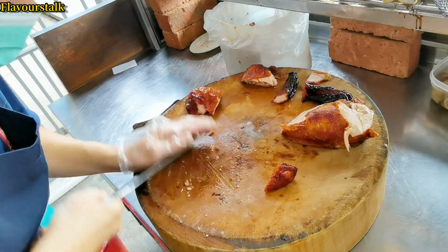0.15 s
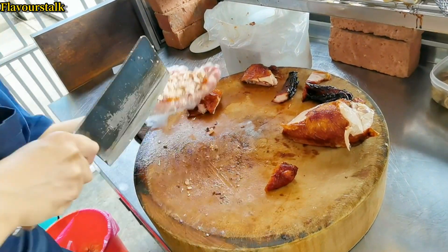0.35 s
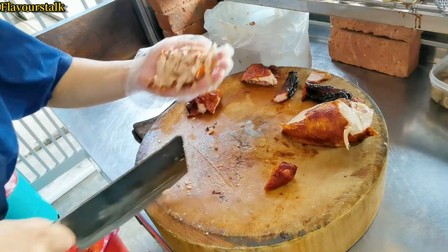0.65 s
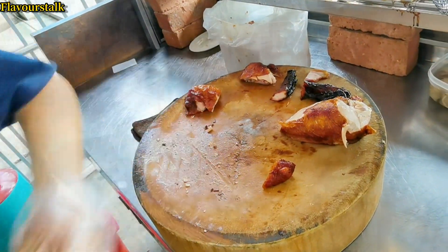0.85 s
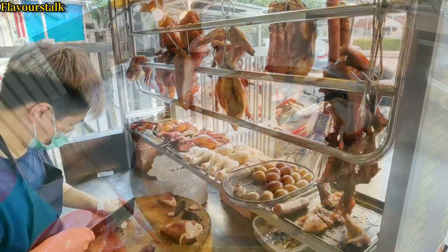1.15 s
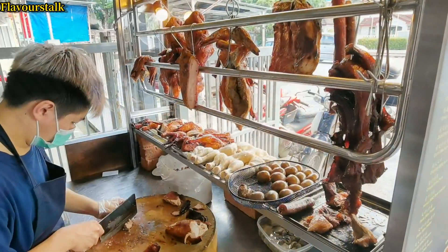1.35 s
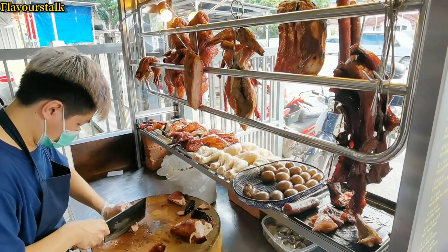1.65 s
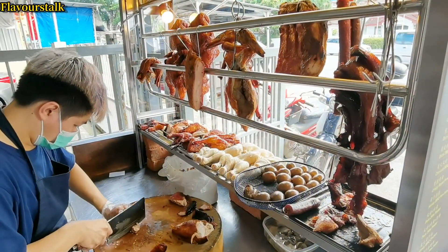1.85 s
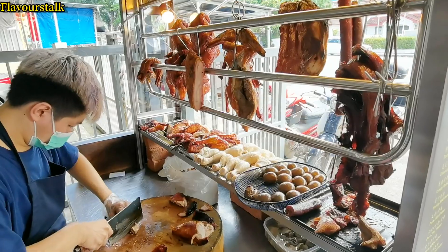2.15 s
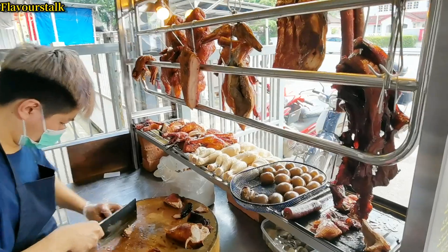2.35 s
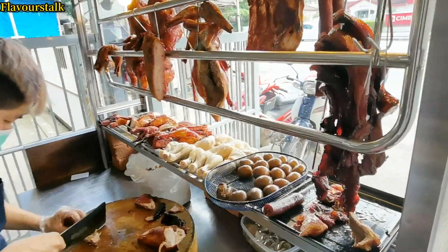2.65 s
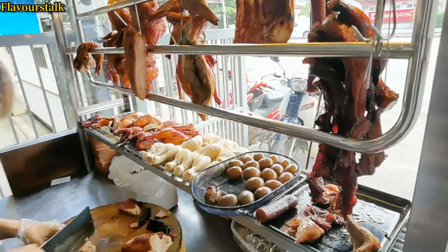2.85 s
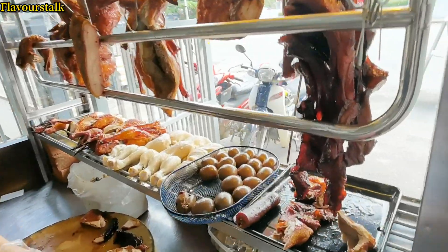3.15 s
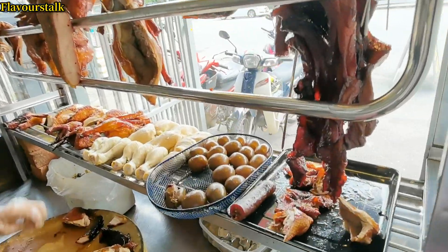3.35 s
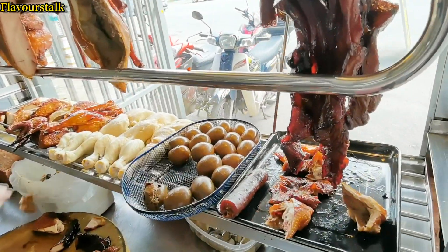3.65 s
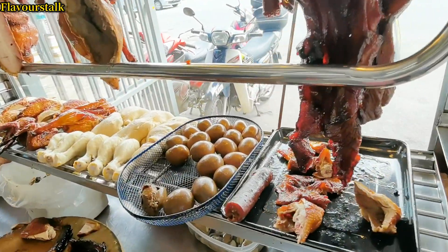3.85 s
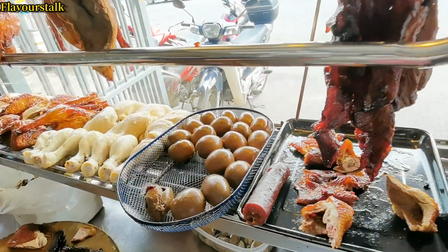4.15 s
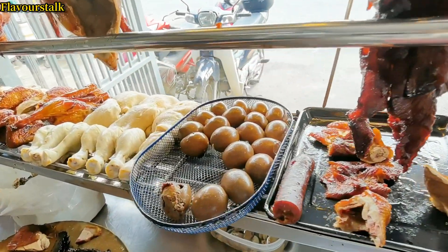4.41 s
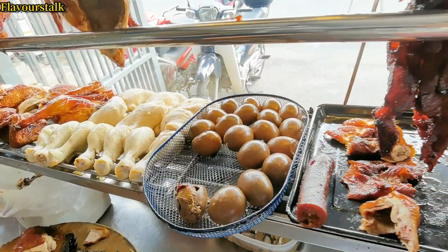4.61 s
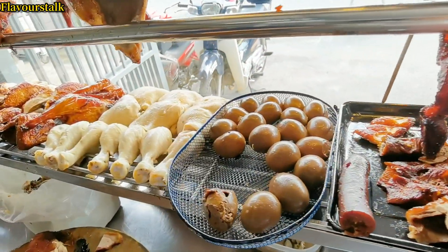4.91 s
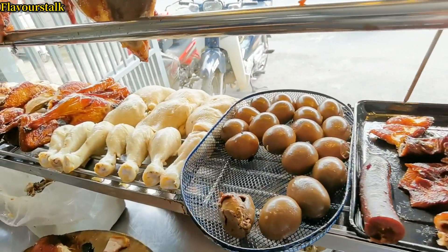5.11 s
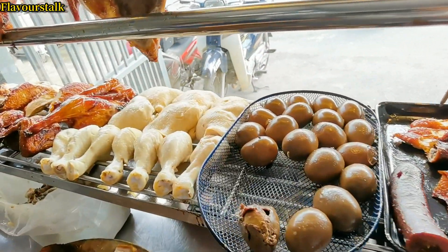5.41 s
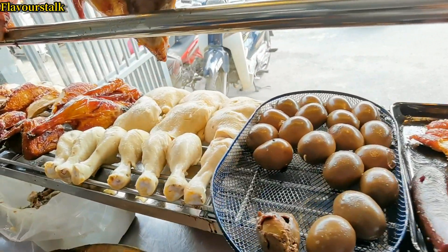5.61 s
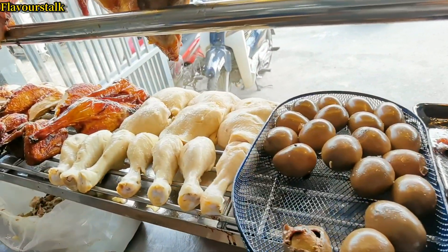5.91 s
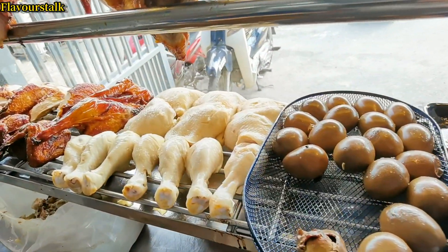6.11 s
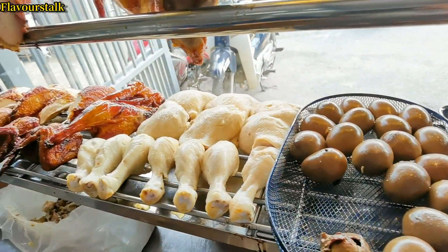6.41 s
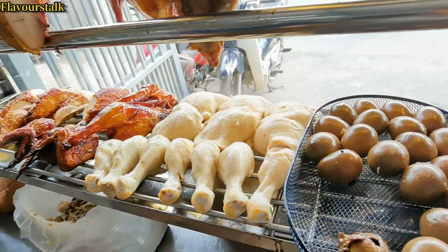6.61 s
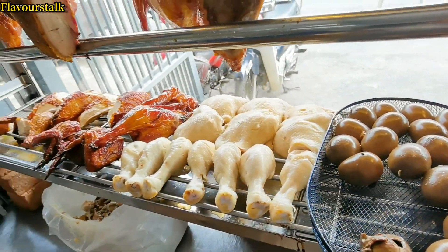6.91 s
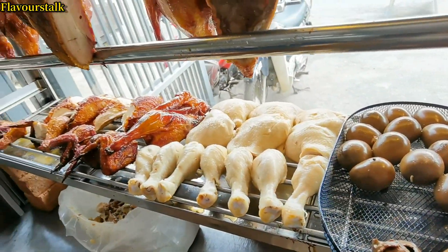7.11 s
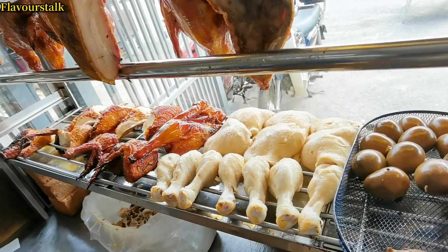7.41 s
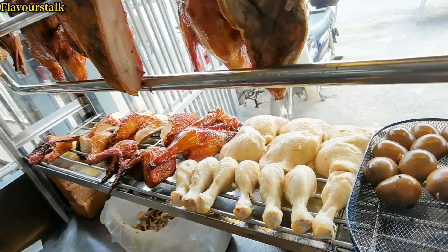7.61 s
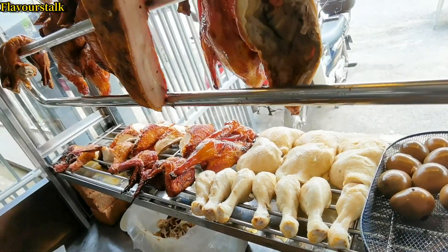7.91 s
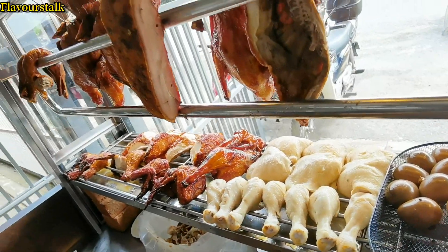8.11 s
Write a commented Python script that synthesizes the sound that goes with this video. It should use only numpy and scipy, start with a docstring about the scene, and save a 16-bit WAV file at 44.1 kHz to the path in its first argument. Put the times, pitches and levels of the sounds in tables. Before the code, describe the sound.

A heavy cleaver chops cooked meat and bone on a thick wooden block, with scrapes, plastic rustles and faint traffic rumble behind.

```python
"""A cleaver chops roast chicken on a thick wooden block that stands on a steel counter in a street stall.
Each stroke tears skin, snaps bone and excites damped modes of blade, block and counter; the stall answers
with near reflections and a diffuse tail. Between strokes the blade scrapes and squeaks, steel pings, and thin
plastic rustles and snaps, all shaped from noise or sine tones. Traffic and a faint hiss are coloured noise
behind; a limiter holds the peaks."""
import sys
import numpy as np
from scipy import signal
from scipy.fft import rfft, irfft, next_fast_len
from scipy.io import wavfile
from scipy.ndimage import uniform_filter1d, minimum_filter1d, map_coordinates

SR = 44100
rng = np.random.default_rng(int(sys.argv[2]) if len(sys.argv) > 2 else 0)


def pcm_store(signal):
    """Save signal as 16-bit PCM."""
    levels = np.round(np.clip(np.atleast_2d(signal), -1, 1) * 32767)
    wavfile.write(sys.argv[1], SR, levels.astype(np.int16).T)


N = 364266
T = np.arange(int(0.7 * SR)) / SR  # time axis of one short event [s]

# All levels are relative, before distance, reflections and the limiter act.
# strokes of the cleaver: start_s, crunch_db, blade_db, blade_hz, crack_db, crack_hz,
# force_db, body_db, knock_db, knock_hz, sway_db, stall_db
CHOPS = [(0.689, -43.5, -27, 1360, -24, 2570, -13, -13, -24, 807, -15, -14.5),
         (2.6624, -57, -17.5, 1310, -18, 2076, -15, -18.5, -22, 640, -32, -4.5),
         (4.5719, -43, -14.5, 1260, -24, 3270, -19, -31, -12, 667, -21, -13),
         (4.783, -43, -12.5, 1236, -31.5, 3440, -18, -24, -18, 696, -31, -8.5),
         (5.036, -32.5, -19.5, 1290, -25.5, 3420, -15.5, -18.5, -26, 650, -20.5, -5),
         (5.32, -27.5, -22, 1334, -24.5, 2900, -9.5, -16, -20.5, 690, -19, -8.5),
         (5.6269, -30, -28.5, 1340, -24.5, 2800, -11.5, -14.5, -15.5, 686, -20, -12),
         (5.945, -31, -28.5, 1170, -34.5, 2830, -14.5, -17.5, -17, 690, -25, -8),
         (6.28, -36.5, -27.5, 1170, -31, 2860, -14.5, -19, -15, 670, -21.5, -10.5),
         (6.63, -57, -27, 1326, -30.5, 2020, -19.5, -19.5, -24, 700, -28, -20)]
# modes of the counter top: pitch_hz, level_db, t60_s
COUNTER_MODES = [(106.6, -13.5, 0.18), (135.8, 4.5, 0.075), (167.6, 1, 0.081)]
# modes of the whole counter on its legs: pitch_hz, level_db, t60_s
SWAY_MODES = [(62, 5, 0.069), (78.8, 1.5, 0.15)]
# lower modes of the wooden block: pitch_hz, level_db, t60_s
BODY_MODES = [(222.4, -2.5, 0.13), (264.4, 1, 0.088), (364.4, 3.5, 0.073), (426, -7.5, 0.12),
              (493, 5.5, 0.018)]
# upper modes of the block, retuned at each stroke: pitch_hz, level_db, t60_s
KNOCK_MODES = [(597, -5.5, 0.042), (683.6, 5, 0.027), (783.5, -11.5, 0.084), (1048, -14.5, 0.024)]
# resonances of the blade: pitch_hz, width_hz, level_db
BLADE_PEAKS = [(1266, 200, 15), (2010, 120, 12.5), (2310, 140, 2), (2705, 67, 0.5), (3045, 140, -3.5),
               (3490, 480, -0.5), (4280, 260, -6.5), (4590, 150, -3)]
# high blade resonances set shimmering by tearing: pitch_hz, width_hz, level_db
SHIMMER_PEAKS = [(4150, 170, -1.5), (6520, 90, 2), (7680, 170, 1), (9320, 220, 4), (10400, 92, -22),
                 (10400, 120, -4)]
# noise of splintering bone and gristle: pitch_hz, level_db (per Hz)
CRACK_SPECTRUM = [(200, 3.5), (700, 6.5), (1100, 11), (1700, 2.5), (2300, 2), (3300, -6.5), (4400, -8.5),
                  (6000, -29), (9500, -14), (15000, -30)]
# noise of tearing skin and meat: pitch_hz, level_db (per Hz)
CRUNCH_SPECTRUM = [(400, 11), (1500, 4), (3000, -7.5), (5200, 0.5), (7500, -4), (9500, -5), (12000, -3),
                   (15500, -15)]
# noise of wood crushed by the edge: pitch_hz, level_db (per Hz)
FIBRE_SPECTRUM = [(120, 1), (280, 0.5), (520, -3), (800, -3), (1100, -4), (1600, -2.5), (2500, -19),
                  (5000, -45), (12000, -45)]
# cut pieces parting from the blade: start_s, squelch_db, gristle_db
SQUELCHES = [(0.734, -47, -42), (2.712, -66, -33.5), (5.336, -27.5, -29.5), (5.364, -35, -48),
             (5.375, -35, -49), (5.643, -31, -30), (5.961, -32.5, -32), (6.002, -41, -38.5),
             (6.066, -43.5, -48), (6.297, -27, -30.5), (6.695, -57, -66)]
# distance to the block: time_s, distance_m
DISTANCE = [(0.7, 0.8), (2.7, 1.12), (4.6, 1.08), (6.6, 1.4)]
SINK_S = 0.0297  # time from bone to wood for a blade at 0 dB: tough bone holds the edge up longer
SWAY_LAG_S = 0.0095  # the heavy counter follows the start of the blow late
FIBRES_DB = -8.5  # relative to the force of the stroke
BONE_T60_S = 0.014  # meat damps the snap of the bone quickly

# light bumps, and the block rocking back after a chop: start_s, thud_db, knock_db, rattle_db
BUMPS = [(0.743, -20.5, -41, -55), (2.718, -29, -29.5, -42), (4.123, -30, -60, -65), (4.314, -23, -45, -60),
         (4.829, -33, -43, -38), (5.085, -30, -30, -46), (5.363, -22, -30, -34.5), (5.662, -24, -33, -33.5),
         (5.688, -20.5, -31, -31.5), (5.992, -20, -28.5, -32), (6.326, -19.5, -36.5, -38),
         (6.668, -24.5, -50, -49), (7.526, -40, -38, -58), (7.737, -39.5, -44.5, -46)]
# noise of the block chattering on the counter: pitch_hz, level_db (per Hz)
RATTLE_SPECTRUM = [(120, -6), (260, 9), (480, 2), (800, 4), (1150, -5), (1600, -19), (2400, -12),
                   (5000, -42), (12000, -70)]
# blade scrapes, each fading as a Gaussian: start_s, length_s (to 1/e), level_db
SCRAPES = [(0.181, 0.082, -35), (0.251, 0.04, -33.5), (1.104, 0.074, -34.5), (1.148, 0.099, -40),
           (7.778, 0.034, -40.5)]
# resonances excited by scraping: pitch_hz, width_hz, level_db
SCRAPE_PEAKS = [(1740, 26, 10.5), (2130, 120, 7.5), (2596, 130, 6.5), (3100, 330, 4.5), (3560, 51, -3),
                (4110, 560, 0), (6550, 360, 0), (7550, 210, 6.5), (8600, 510, -1), (9500, 370, 0)]
# the edge sticks and squeaks: start_s, length_s, start_hz, end_hz, level_db
SQUEAKS = [(0.172, 0.035, 2770, 2100, -39), (0.174, 0.028, 3210, 3190, -37),
           (0.267, 0.031, 2540, 2560, -33.5), (1.1, 0.032, 2730, 2570, -43),
           (1.105, 0.017, 4130, 4060, -40)]
# thin metal pings: start_s, pitch_hz, level_db, t60_s
PINGS = [(6.298, 6580, -32, 0.11), (6.631, 5980, -25.5, 0.03), (7.236, 5720, -39, 0.18),
         (7.262, 11750, -43, 0.08), (7.283, 10780, -41, 0.09), (7.262, 3620, -43, 0.088),
         (7.705, 5700, -49, 0.15), (7.785, 5570, -34, 0.07)]
# swishes of thin plastic: middle_s, half_length_s (to half power), level_db
SWISHES = [(0.234, 0.064, -42.5), (1.02, 0.042, -46.5), (1.133, 0.041, -48), (1.354, 0.0095, -42.5),
           (1.583, 0.11, -41.5), (2.921, 0.071, -41.5), (3.183, 0.066, -35.5), (3.582, 0.04, -34),
           (3.722, 0.037, -37), (3.956, 0.02, -32), (4.021, 0.036, -31.5), (4.14, 0.02, -42.5),
           (6.692, 0.029, -39.5), (6.942, 0.05, -44), (7.444, 0.023, -39), (7.798, 0.02, -35.5)]
# noise of plastic being handled: pitch_hz, level_db (per Hz)
PLASTIC_SPECTRUM = [(1410, -27), (2400, -12), (2900, -11), (3140, -14), (3980, -9), (5120, -11), (7710, -4),
                    (8410, -2.5), (10200, -3), (15800, -14)]
# a plastic bag snapping taut: start_s, level_db
SNAPS = [(4.29, -26), (4.2989, -10.5), (4.304, -16), (4.312, -26), (4.321, -23)]
# noise of the snapping film: pitch_hz, level_db (per Hz)
SNAP_SPECTRUM = [(880, -47), (1500, -30), (2000, -28), (2580, -17), (3470, -25), (3750, -25), (5350, -18),
                 (6200, -12), (7450, -24), (9000, -13), (15800, -26)]
# resonances of the stretched film: pitch_hz, width_hz, level_db
FILM_PEAKS = [(2540, 260, -3), (3000, 270, -1.5), (6400, 380, -2), (7330, 330, 5.5), (9050, 680, 6),
              (11400, 900, -12)]

# distant traffic, one value each: rumble_db, engine_db, tyre_db
STREET_DB = (-43, -45.5, -49.5)
# vehicles passing: nearest_s, half_s (to about half power), rumble_db, engine_db, tyre_db
PASSES = [(0.55, 2.6, -57, -36, -79), (1.64, 0.22, -33.5, -29.5, -38.5), (3.9, 4.27, -40, -39.5, -43.5),
          (4.7, 0.39, -26.5, -40.5, -42.5)]
# deep traffic rumble: pitch_hz, level_db (per Hz)
RUMBLE_SPECTRUM = [(12, -39), (20, -10.5), (81, 1.5), (125, -2), (160, -16), (280, -120)]
# engine noise: pitch_hz, level_db (per Hz)
ENGINE_SPECTRUM = [(62, -57), (105, -2.5), (118, -4.5), (152, 2.5), (188, -8.5), (216, -10.5), (279, -12),
                   (334, -7.5), (520, -18), (680, -26), (1140, -120)]
# tyre noise: pitch_hz, level_db (per Hz)
TYRE_SPECTRUM = [(260, -3.5), (450, -7), (1250, -11), (1670, -14.5), (2690, -18.5), (3200, -23.5),
                 (4060, -23), (4990, -33), (6000, -25), (7800, -37), (13200, -120)]
# strength of the 7-12 kHz part of the hiss: time_s, level_db
HISS_LEVEL = [(0.0, -47.5), (0.2, -45), (0.8, -58), (1.52, -50), (2.0, -52.5), (2.78, -50), (2.94, -56.5),
              (4.55, -45.5), (4.76, -55), (5.82, -52.5), (6.19, -58.5), (6.88, -49), (7.11, -55),
              (7.84, -46.5), (8.01, -51.5), (8.26, -57.5)]
# noise of the hiss: pitch_hz, level_db (per Hz)
HISS_SPECTRUM = [(1760, -4.5), (3000, -6.5), (3850, -6), (5090, -8.5), (6220, -7), (7610, -1.5),
                 (9710, 1.5), (15200, -14)]
HISS_DB = 3.5  # the whole hiss over its 7-12 kHz part

# decay of the stall's diffuse field: pitch_hz, t60_s
STALL_DECAY = [(60, 1), (150, 0.61), (400, 0.29), (900, 0.41), (2500, 0.48), (9000, 0.27)]
# colour of the stall's diffuse field: pitch_hz, level_db
STALL_COLOUR = [(40, 2), (90, -1.5), (150, -6.5), (300, 1), (700, -4), (1300, -11), (2200, -9.5),
                (10000, -13)]
# likeness of left and right in a diffuse field: pitch_hz, correlation (no unit)
LIKENESS = [(60, 0.99), (130, 0.99), (290, 0.95), (640, 0.84), (1410, -0.27), (3100, 0.089), (6820, -0.07),
            (15000, 0.12)]
# how much sooner the left port hears the block: pitch_hz, lead_ms
LEAD = [(150, 0.073), (700, 0.19), (1300, 0.25), (3000, 0.301)]
# random phase from clutter on the way: pitch_hz, scatter_rad
SCATTER = [(400, 0.04), (1300, 0.15), (2100, 0.6), (4000, 1.2)]
# fall of the limiter's two gain cuts, one value each: fast_db_per_s, slow_db_per_s (before SLOW_SHARE)
RELEASE_DB_PER_S = (250, 5)
CEILING_DB, TOP_HZ = -1.6, 15900  # limiter threshold, band limit
SLOW_SHARE = 0.23  # part of the gain cut that lets go at the slower speed


def chops():
    """Impact and modal ringing: bone and blade sound first, then the edge sinks to the block and counter."""
    out = np.zeros((2, N))
    for (s, _, blade_db, blade_hz, crack_db, crack_hz,
         force_db, body_db, knock_db, knock_hz, sway_db, stall_db) in CHOPS:
        distance = np.interp(s, *np.transpose(DISTANCE))
        sink = SINK_S * amp(blade_db)  # tougher bone rings the blade harder and delays the wood
        thud = amp(force_db) * ring(COUNTER_MODES, attack=0.0097, scatter_db=3.7, detune=0.029)
        body = amp(body_db) * ring(BODY_MODES, attack=0.00025, scatter_db=2.5, detune=0.023)
        # the pitch of the knock depends on where the edge lands
        tune = knock_hz / KNOCK_MODES[1][0]
        knock = amp(knock_db) * ring(KNOCK_MODES, attack=0.0012, scatter_db=1.5, detune=0.015, flip=1, tune=tune)
        crushing = noise(FIBRE_SPECTRUM)[0] * grains(2.6, size=90) * onset(0.0006) * fade(0.15)
        fibres = amp(force_db + FIBRES_DB) * unit_blow(crushing)
        sway = amp(sway_db) * ring(SWAY_MODES, attack=0.006, scatter_db=1, detune=0.04)
        edge = (amp(blade_db) * blade(blade_hz) + amp(crack_db) * crack(crack_hz)) / distance
        blow = edge.copy()
        add(blow, sink, thud - (body + knock - fibres) / distance)
        add(blow, SWAY_LAG_S, sway)
        direct = from_left(blow) * amp([[0.4], [-0.4]])  # slightly louder on the left
        add(out, s, direct + near_walls(edge) + stall(blow * np.sqrt(distance), stall_db))
    return out


def blade(hz, t60=0.04, chatter_db=-9):
    """Bending vibration: the first mode is driven unevenly while the bone yields and is damped by the meat."""
    modes = [(hz, 0, t60), (hz * 1.1, -11, 0.022)]
    mode = ring(modes, attack=0.0012, scatter_db=1, detune=0.004, flip=1)
    drive = rng.standard_normal(len(T)) * fade(0.05)
    # the cube narrows the resonance
    chatter = filtered(drive, lambda f: resonances([(hz * 0.97, 450, 0)], f) ** 3)
    return mode + amp(chatter_db) * unit_blow(chatter)


def crack(centre_hz, focus_db=11, t60=0.054, modes_db=-9, rattle_db=-6, splinter_db=-5,
          life=0.059, after_db=-12, after_life=0.058):
    """Brittle fracture: one sharp snap rings the blade's nearby modes, then smaller snaps splinter the bone."""
    modes = [(centre_hz, 3, BONE_T60_S)]
    for hz, _, db in BLADE_PEAKS:
        modes.append((hz, modes_db + db - focus_db * np.log2(hz / centre_hz) ** 2, t60))
    snap = ring(modes, attack=0.0012, scatter_db=1.5, detune=0.008)
    decay = fade(life) + amp(after_db) * fade(after_life)
    splinters = grains(7.7, size=40) * decay * onset(0.0025)
    rattle = filtered(rng.standard_normal(len(T)) * splinters, lambda f: steel(f, centre_hz, focus_db=12))
    splintering = unit_blow(noise(CRACK_SPECTRUM)[0] * splinters)
    return amp(0.5) * snap + amp(rattle_db) * unit_blow(rattle) + amp(splinter_db) * splintering


def steel(f, centre_hz, focus_db):
    """Selective resonance: the blade responds most in the modes nearest centre_hz."""
    return resonances(BLADE_PEAKS, f) * amp(-focus_db * np.log2((f + 1) / centre_hz) ** 2)


def bone_splits(lead=0.022, rise=0.0073):
    """Forced vibration: the blade already shivers while it forces its way into the bone."""
    out = np.zeros((2, N))
    press = np.exp(np.minimum(T - lead, 0) / rise) * fade(0.008, np.maximum(T - lead, 0))
    for s, _, blade_db, blade_hz, crack_db, crack_hz, *_ in CHOPS:
        shiver = filtered(rng.standard_normal(len(T)), lambda f: resonances([(blade_hz, 280, 0)], f) ** 2)
        force = rng.standard_normal(len(T)) * grains(0.84)
        creak = filtered(force, lambda f: steel(f, crack_hz, focus_db=17))
        split = amp(blade_db - 13.5) * unit(shiver) + amp(crack_db - 0.5) * unit(creak)
        add(out, s - lead, from_left(press * split))
    return out


def crunches(lead=0.04, rise=0.0073, wet_db=5):
    """Progressive tearing: skin and meat tear with growing strength ahead of the blow."""
    out = np.zeros((2, N))
    tear = np.exp(np.minimum(T - lead + 0.01, 0) / rise) * fade(0.13, np.maximum(T - lead, 0))
    for s, crunch_db, *_ in CHOPS:
        crunch = amp(crunch_db) * wet() * tear
        add(out, s - lead, from_left(crunch) + stall(crunch, wet_db))
    return out


def squelches():
    """Parting of moist surfaces: short bursts of wet and gristly noise as the cut pieces leave the blade."""
    out = np.zeros((2, N))
    part = unit_blow(onset(0.0035) * fade(0.038))
    for s, squelch_db, gristle_db in SQUELCHES:
        gristle = noise(CRACK_SPECTRUM)[0] * grains(3)
        squelch = part * (amp(squelch_db - 4.5) * wet() + amp(gristle_db) * gristle)
        add(out, s, from_left(squelch) + stall(squelch, wet_db=5.5))
    return out


def wet(shimmer_db=-3):
    """Granular excitation: moist fibres tear, and their grains set the blade's high modes shimmering."""
    tearing = noise(CRUNCH_SPECTRUM)[0] * grains(3.2, size=70)
    shimmer = unit(filtered(tearing, lambda f: resonances(SHIMMER_PEAKS, f)))
    return tearing + amp(shimmer_db) * shimmer


def bumps():
    """Light impact: bumps ring the counter and block, and the block chatters where they touch."""
    out = np.zeros((2, N))
    for s, thud_db, knock_db, rattle_db in BUMPS:
        thud = ring(SWAY_MODES + COUNTER_MODES, attack=0.0066, scatter_db=0.93, detune=0.093)
        knock = ring(BODY_MODES + KNOCK_MODES, attack=0.0022, scatter_db=4.8, detune=0.056)
        chatter = noise(RATTLE_SPECTRUM)[0] * grains(3.5, size=150) * onset(0.003) * fade(0.17)
        bump = amp(thud_db) * thud + amp(knock_db) * knock + amp(rattle_db) * unit_blow(chatter)
        add(out, s, from_left(bump) + stall(bump, wet_db=-3.5))
    return out


def scrapes():
    """Friction: irregular slips of the blade excite its resonances as filtered noise."""
    out = np.zeros((2, N))
    for s, length, db in SCRAPES:
        stroke = onset(0.0038) * np.exp(-(T / length) ** 2)
        slips = rng.standard_normal((2, len(T))) * grains(3.5, size=130)
        scrape = amp(db) * stroke * unit(filtered(slips, lambda f: resonances(SCRAPE_PEAKS, f)))
        add(out, s, scrape + stall(scrape, wet_db=3))
    return out


def squeaks(waver=0.013):
    """Stick-slip: the edge dragged over the wet block squeals at a gliding, unsteady pitch."""
    out = np.zeros((2, N))
    for s, length, start_hz, end_hz, db in SQUEAKS:
        u = np.minimum(T / length, 1)
        drift = unit(uniform_filter1d(rng.standard_normal(len(T)), size=60))
        hz = (start_hz + (end_hz - start_hz) * u) * (1 + waver * drift)
        tone = np.sin(2 * np.pi * np.cumsum(hz) / SR)
        squeak = amp(db) * np.sin(np.pi * u) * tone * grains(2.5)
        add(out, s, squeak + stall(squeak, wet_db=0))
    return out


def pings():
    """Free vibration: thin steel rings as decaying sines whose phase and strength jingle at random."""
    out = np.zeros((2, N))
    for s, hz, db, t60 in PINGS:
        jingle = 0.6 * unit(uniform_filter1d(rng.standard_normal(len(T)), size=130))  # rad
        tone = np.sin(2 * np.pi * hz * T + jingle)
        ping = amp(db) * tone * fade(t60) * onset(0.0037) * grains(1.8)
        add(out, s, ping + stall(ping, wet_db=-11))
    return out


def plastic_swishes(crinkle_db=-9):
    """Rubbing and buckling: handled plastic gives fluctuating noise and sparse clicks from its creases."""
    t = np.arange(N) / SR
    swish = np.sqrt(sum(amp(db) ** 2 / (1 + ((t - s) / half) ** 4) for s, half, db in SWISHES))
    creases = (rng.random(N) < 250 / SR) * rng.standard_normal((2, N))  # about 250 a second
    crinkle = unit(spread(creases, PLASTIC_SPECTRUM))
    flicker = amp(1.5 * wobble(60) + 1.3 * wobble(420))
    return swish * flicker * (rush(PLASTIC_SPECTRUM, patchy_db=1.2) + amp(crinkle_db) * crinkle)


def film(ring_db=0):
    """Membrane resonance: noise in the stretched film also excites its modes."""
    hum = filtered(rng.standard_normal((2, len(T))), lambda f: resonances(FILM_PEAKS, f))
    return unit(noise(SNAP_SPECTRUM, channels=2) + amp(ring_db) * unit(hum))


def plastic_snaps(pull=0.03, flutter_db=-17):
    """Sudden tension: a bag is pulled taut, gives a burst of snaps and flutters out."""
    out = np.zeros((2, N))
    peak_s = 0.0014
    snap_shape = (T / peak_s) ** 2 * np.exp(2 - 2 * T / peak_s)
    for s, db in SNAPS:
        flutter = fade(0.22) * onset(0.001) * grains(3, size=150)
        add(out, s, amp(db) * film() * (snap_shape + amp(flutter_db) * flutter))
    taut_s, _ = max(SNAPS, key=lambda snap: snap[1])
    add(out, taut_s - pull, amp(-25.5) * film() * (T < pull) * T / pull)  # swells up to the loudest snap
    return out


def traffic():
    """Addition of powers: rumble, engine and tyre noise swell as each vehicle draws near."""
    t = np.arange(N) / SR
    power = amp(STREET_DB)[:, None] ** 2
    for s, half, *nearest_db in PASSES:
        power = power + amp(nearest_db)[:, None] ** 2 / (1 + ((t - s) / half) ** 2 / 2) ** 2
    rumble_gain, engine_gain, tyre_gain = np.sqrt(power)
    rumble = rumble_gain * amp(1.4 * wobble(8.2)) * rush(RUMBLE_SPECTRUM, patchy_db=0.5)
    engines = engine_gain * amp(0.24 * wobble(9.6)) * rush(ENGINE_SPECTRUM, patchy_db=3.0)
    tyres = tyre_gain * amp(0.37 * wobble(3.6)) * rush(TYRE_SPECTRUM, patchy_db=1.2)
    return rumble + engines + tyres


def hiss():
    """Broadband noise: a faint, smooth high hiss rises and falls."""
    hiss_db, = curves(HISS_LEVEL)
    return amp(HISS_DB + hiss_db) * rush(HISS_SPECTRUM, patchy_db=2)


def from_left(x):
    """Interaural-style delay: the left port hears first, and clutter on the way scrambles the treble's phase."""
    knots = rng.standard_normal((2, 80))  # one every 350 Hz for each port

    def response(hz):
        clutter = along(SCATTER, hz) * [map_coordinates(k, [hz / 350], mode="nearest") for k in knots]
        lead = np.pi * hz * along(LEAD, hz) / 1000  # half the lead for each port
        return np.exp(1j * (lead * np.array([[1], [-1]]) + clutter))
    return filtered(x, response)


def near_walls(x, db=-13, count=6):
    """Early reflection: steel panels close by throw back a few distinct copies, different at each port."""
    out = np.zeros((2, len(T)))
    for port in out:
        delays_s = rng.uniform(0.0052, 0.026, count)
        for delay, size in zip(delays_s, rng.standard_normal(count)):
            add(port, delay, amp(db) * size / np.sqrt(count) * x)
    return out


def stall(x, wet_db, build=0.0019, wall_s=0.047, wall_db=3):
    """Reverberation: a diffuse tail builds up, decays by frequency and is lifted when the far wall answers."""
    hz, t, z = signal.stft(rng.standard_normal((2, len(T))), SR, nperseg=256)
    decay = fade(along(STALL_DECAY, hz)[:, None], t)
    tail = signal.istft(z * decay, SR, nperseg=256)[1][:, :len(T)]
    wall = amp(wall_db * np.clip((T - wall_s) * 200, 0, 1))  # lifts over 5 ms
    tail = tail * onset(build) * wall
    tail = spread(tail / np.linalg.norm(tail[0]), STALL_COLOUR)
    return amp(wet_db) * signal.fftconvolve(np.atleast_2d(x), tail, axes=1)[:, :len(T)]


def spread(pair, spectrum):
    """Diffuse-field coherence: two unrelated signals become alike in the bass, nearly unrelated in the treble."""
    def response(hz):
        turn = np.arccos(np.clip(along(LIKENESS, hz), -1, 1)) / 2
        return amp(along(spectrum, hz)) * [np.cos(turn), np.sin(turn)]
    mid, side = filtered(pair, response)
    return np.array([mid + side, mid - side])


def rush(spectrum, patchy_db):
    """Fluctuating noise: a stereo stream of rms 1 has patches of random gain in time and frequency."""
    z = signal.stft(rng.standard_normal((2, N)), nperseg=512)[2]
    field = uniform_filter1d(rng.standard_normal(z.shape[1:]), size=5, axis=0)
    field = uniform_filter1d(field, size=12, axis=1)
    patchy = signal.istft(z * amp(patchy_db * unit(field)), nperseg=512)[1][:, :N]
    return unit(spread(patchy, spectrum))


def ring(modes, attack, scatter_db, detune, flip=-1, tune=1):
    """Modal superposition: each blow shifts strengths and pitches; flip -1 opposes neighbours, so they swell."""
    hz, db, t60 = np.transpose(modes)[:, :, None]
    level, pitch = rng.standard_normal((2, len(modes), 1))
    sign = flip ** np.arange(len(modes))[:, None]
    tones = np.sin(2 * np.pi * tune * hz * (1 + detune * pitch) * T)
    partials = sign * amp(db + scatter_db * level) * fade(t60) * tones
    return unit_blow(partials.sum(0) * onset(attack))


def resonances(peaks, f):
    """Driven oscillators: the causal response of (pitch_hz, width_hz, level_db) peaks, alternating in sign."""
    total = 0
    for k, (centre, width, db) in enumerate(peaks):
        damping = 1j * f * width
        total = total + (-1) ** k * amp(db) * damping / (centre * centre - f * f + damping)
    return total


def noise(spectrum, channels=1):
    """Spectral shaping: a short stretch of coloured noise of rms 1."""
    white = rng.standard_normal((channels, len(T)))
    return unit(filtered(white, lambda hz: amp(along(spectrum, hz))))


def grains(depth_db, size=60):
    """Intermittency: a spiky random gain of rms 1, smoothed over size samples."""
    return unit(amp(depth_db * unit(uniform_filter1d(rng.standard_normal(len(T)), size))))


def fade(t60, t=T):
    """Damping: exponential decay by 60 dB in t60 seconds."""
    return np.exp(-np.log(1000) * t / t60)


def onset(attack):
    """Build-up: a gain rises exponentially from 0 towards 1."""
    return 1 - np.exp(-T / attack)


def wobble(rate):
    """Slow fluctuation: a smooth random curve with rate knots a second."""
    knots = rng.standard_normal(int(N * rate / SR) + 4)
    return map_coordinates(knots, [np.arange(N) * rate / SR])


def amp(db):
    """Logarithmic level: decibels to gain."""
    return 10 ** (np.asarray(db) / 20)


def unit(x):
    """Mean power: scale to rms 1."""
    return x / np.sqrt(np.mean(x ** 2) + 1e-20)


def unit_blow(x):
    """Onset power: scale to rms 1 over the first 25 ms."""
    return x / np.sqrt(np.mean(x[:SR // 40] ** 2) + 1e-20)


def along(points, hz):
    """Logarithmic pitch: interpolate (pitch_hz, value) points on a log axis."""
    f, v = np.transpose(points)
    return np.interp(np.log(hz + 1), np.log(f + 1), v)


def curves(rows):
    """Linear interpolation: one value per sample for each column after the time."""
    s, *cols = np.transpose(rows)
    return [np.interp(np.arange(N) / SR, s, c) for c in cols]


def filtered(x, response):
    """Linear filtering: multiply the spectrum of x by a complex response of frequency."""
    n = x.shape[-1]
    m = next_fast_len(n + 8192)
    return irfft(rfft(x, m) * response(np.fft.rfftfreq(m, 1 / SR)), m)[..., :n]


def add(track, s, x):
    """Superposition: mix x into the track from time s."""
    i = max(round(s * SR), 0)
    track[..., i:i + x.shape[-1]] += x[..., :track.shape[-1] - i]


def scene():
    """Superposition of everything heard beside the stall."""
    strokes = chops() + bone_splits() + crunches() + squelches()
    handling = bumps() + scrapes() + squeaks() + pings() + plastic_swishes() + plastic_snaps()
    return strokes + handling + traffic() + hiss()


def record(dry):
    """Peak limiting: the gain drops at each peak and recovers mostly fast, partly slowly; a low-pass follows."""
    over_db = np.maximum(20 * np.log10(np.abs(dry).max(0) + 1e-9) - CEILING_DB, 0)
    # a running maximum on a rising ramp makes each gain cut fall at its release speed
    release_db = np.outer(RELEASE_DB_PER_S, np.arange(N) / SR)
    fast_db, slow_db = np.maximum.accumulate(over_db + release_db, axis=1) - release_db
    held_db = np.maximum(fast_db, SLOW_SHARE * slow_db)
    gain = uniform_filter1d(minimum_filter1d(amp(-held_db), size=50), size=44)
    return filtered(dry * gain, lambda hz: 1 / (1 + (hz / TOP_HZ) ** 200))


dry = scene()
out = record(dry)
pcm_store(out)
```